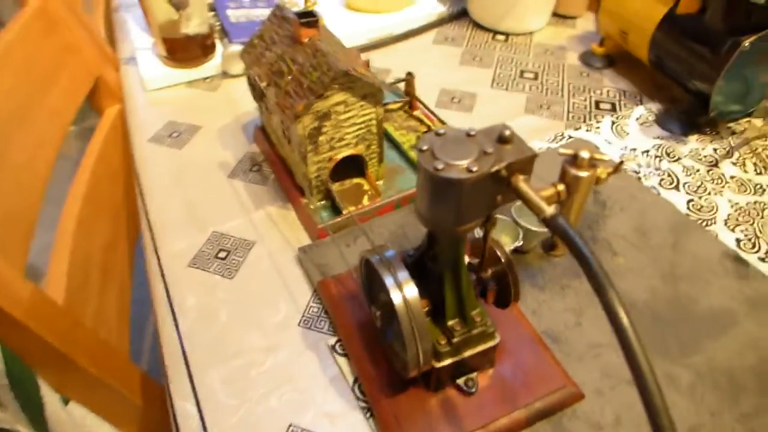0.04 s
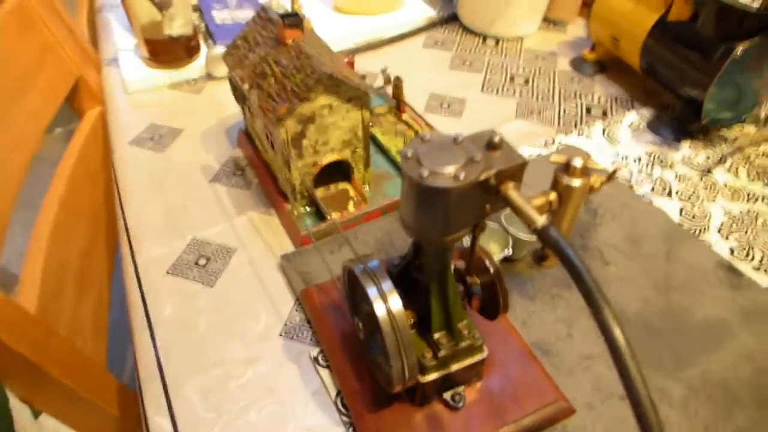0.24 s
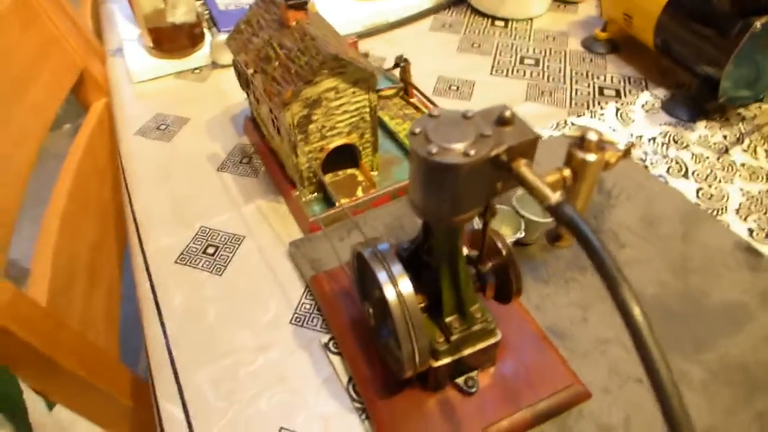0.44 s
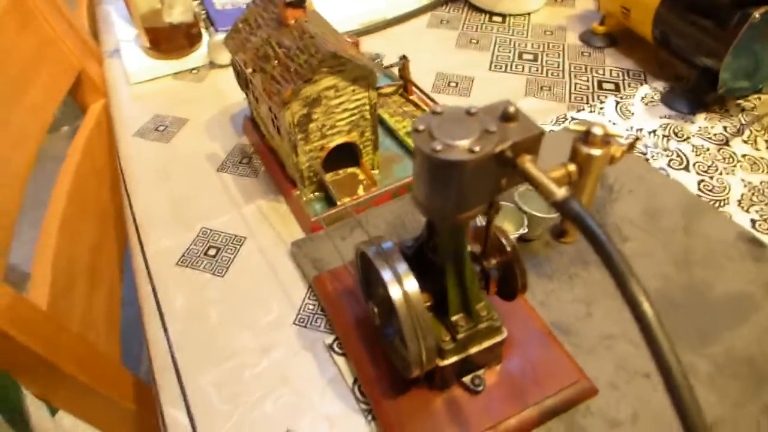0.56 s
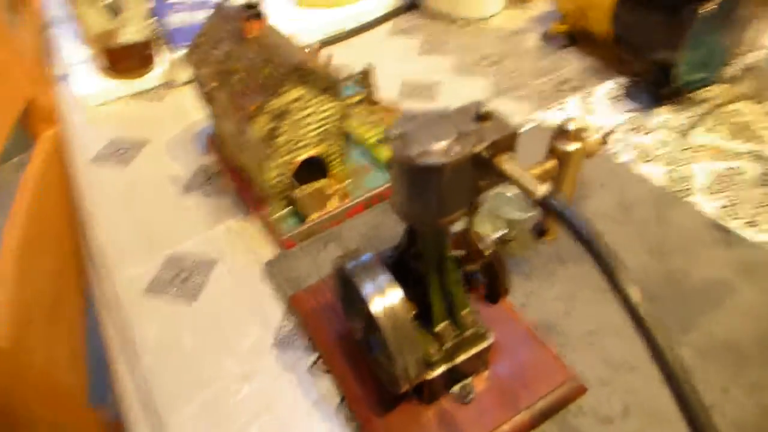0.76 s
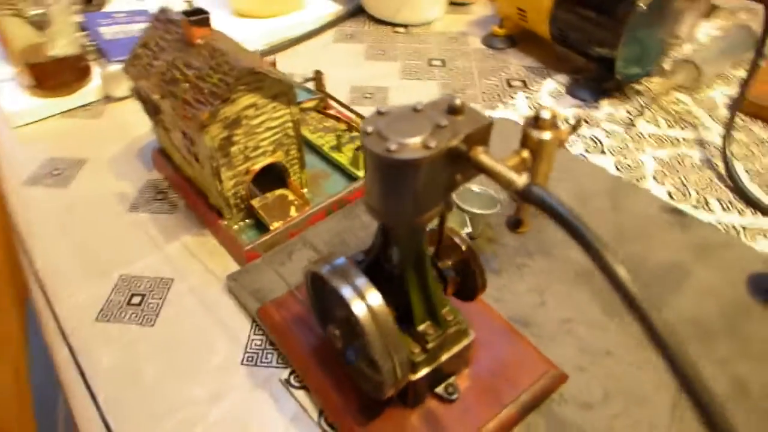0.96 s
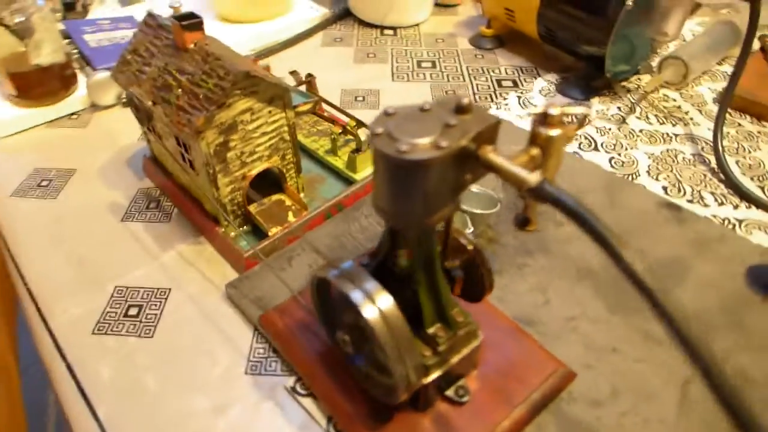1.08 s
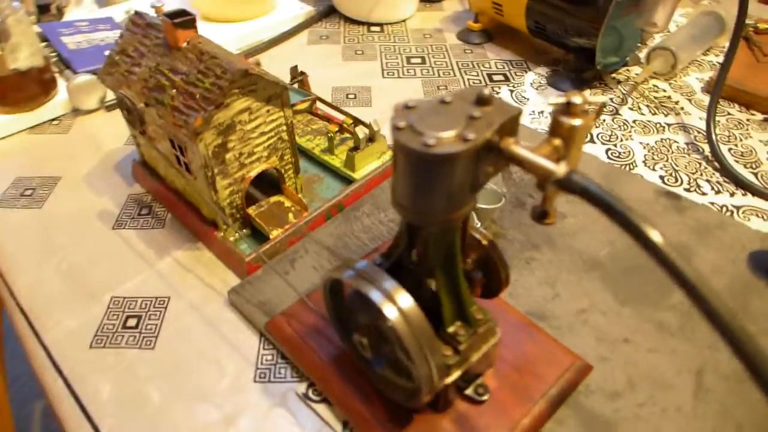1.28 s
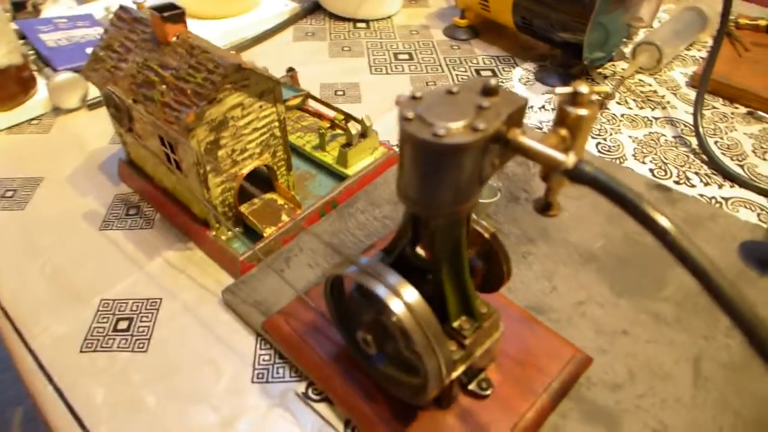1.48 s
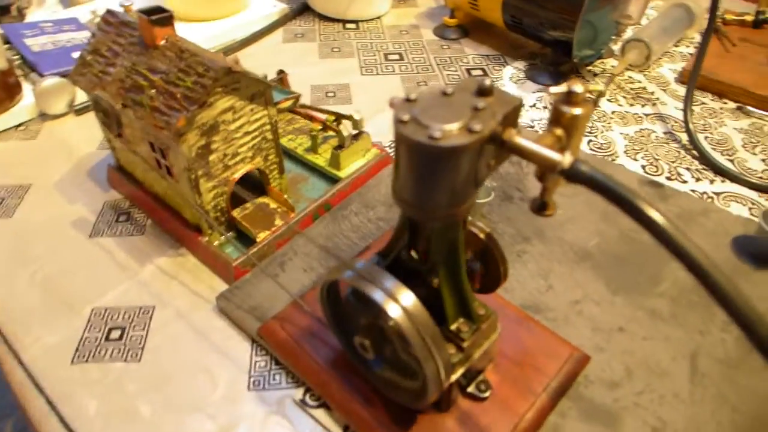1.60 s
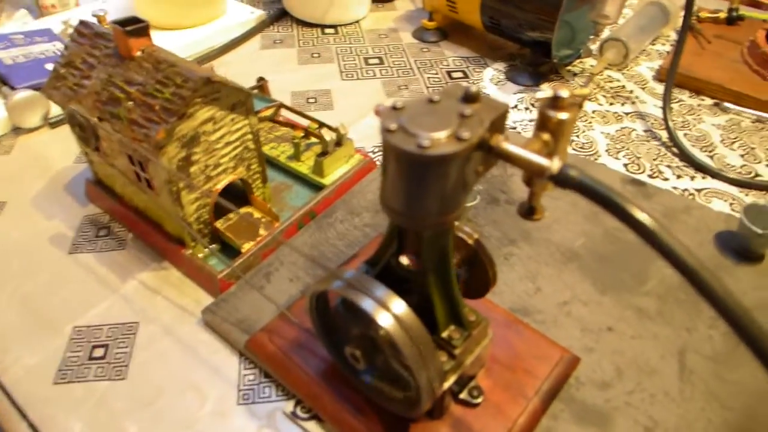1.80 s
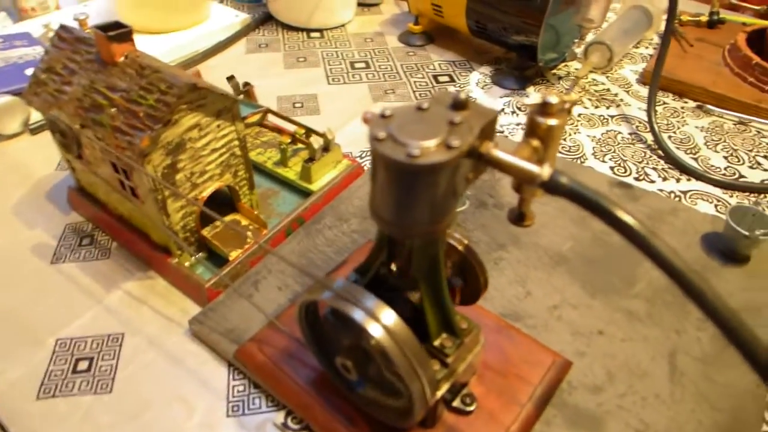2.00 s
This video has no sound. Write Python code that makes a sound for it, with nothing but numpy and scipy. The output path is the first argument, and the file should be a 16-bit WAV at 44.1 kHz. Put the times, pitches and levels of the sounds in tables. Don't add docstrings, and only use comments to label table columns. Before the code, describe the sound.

A little single-cylinder engine runs rapidly, sharp air puffs and loose metallic clatter on a wooden base

```python
import sys
import numpy as np
from scipy import signal
from scipy.io import wavfile

SR = 44100
rng = np.random.default_rng(int(sys.argv[2]) if len(sys.argv) > 2 else 0)


def magnitude_from_level(level_db):
    exponent = np.asarray(level_db, float) / 20
    return 10 ** exponent


def put_to_file(sound):
    columns = np.atleast_2d(sound).T
    safe = np.clip(columns, -1, 1)
    whole_steps = np.round(safe * 32767)
    wavfile.write(sys.argv[1], SR, whole_steps.astype(np.int16))


N = 89964

# start_s, hiss_peak_db, thump_relative_db, hold_ms
DOWN_STROKES = [(0.0255, -5, -12, 5.3), (0.16, -8.5, -7.5, 17), (0.2852, -7.5, -6.5, 6.6),
                (0.396, -5.5, -12.5, 6.7), (0.5047, -6, -8.5, 6.4), (0.6209, -9, -5.5, 9),
                (0.7688, -5.5, -10.5, 8.7), (0.8896, -4, -6.5, 1.3), (1.0091, -7, -6.5, 6.6),
                (1.1277, -4.5, -8, 3.1), (1.2397, -5.5, -10, 2.5), (1.3504, -5, -12.5, 1.7),
                (1.4586, -6.5, -12.5, 8.2), (1.5672, -5.5, -12.5, 5.2), (1.6796, -7, -7.5, 11),
                (1.7985, -7.5, -6.5, 1.7), (1.8991, -7.5, -9, 9.4), (1.9936, -9, -5.5, 5.9)]
# start_s, hiss_peak_db, thump_relative_db, hold_ms
RETURN_STROKES = [(0.0842, -9, -7.5, 6.5), (0.2145, -11.5, -2, 8), (0.3247, -11.5, -2.5, 9.2),
                  (0.4332, -7.5, -5.5, 7.4), (0.5527, -14.5, -0.5, 8.6), (0.7023, -8, -6.5, 5.7),
                  (0.8233, -10.5, 0, 2.5), (0.9393, -6.5, -15, 9.2), (1.0627, -8, -3.5, 6.9),
                  (1.1742, -12, -2.5, 6.8), (1.287, -4, -11.5, 2.7), (1.398, -7.5, -13, 5.1),
                  (1.5029, -14.5, 2, 8.6), (1.6122, -8.5, -7, 4.3), (1.7426, -7, -6, 1.8),
                  (1.8377, -6.5, -6, 3.9), (1.942, -11.5, -6, 7.7), (2.0314, -6.5, -3, 5)]
# freq_hz, level_db_per_hz
PUFF_SPECTRUM = [(530, -70), (900, -2.5), (1900, -26.5), (2330, -1), (3770, -7.5), (5040, -4), (10200, -5),
                 (13800, -8), (16000, -22)]
# freq_hz, level_db, t60_s
BASE_MODES = [(557, -2.5, 0.11), (595.5, -8.5, 0.15), (642.7, -2.5, 0.085), (720, 3, 0.04),
              (724.3, -5, 0.091), (784.7, -3.5, 0.089), (1001, -7, 0.054), (1082, -8, 0.11),
              (1214, -13, 0.15), (1030, -47, 0.031), (666, -5, 0.033)]
# freq_hz, level_db, t60_s
FRAME_MODES = [(1461, 1.5, 0.024), (1601, -5, 0.11), (1702, -4.5, 0.037), (2370, -6, 0.067),
               (2474, -8.5, 0.049), (2737, -7.5, 0.078), (3100, -9.5, 0.079), (3420, -3, 0.052),
               (4130, -9, 0.094), (5038, 2.5, 0.027), (6970, 3.5, 0.016), (8620, 7.5, 0.0078),
               (9200, -25, 0.017), (9900, -24, 0.024)]
# start_s, peak_db, favoured_pitch_hz
JOLTS = [(0.028, -11.5, 725), (0.054, -12, 716), (0.085, -15, 644), (0.162, -15.5, 899), (0.162, -17, 780),
         (0.224, -13, 573), (0.243, -15, 625), (0.287, -14, 760), (0.329, -15, 720), (0.397, -14, 555),
         (0.422, -32, 746), (0.438, -9, 640), (0.506, -10.5, 820), (0.558, -16, 730), (0.622, -19, 552),
         (0.702, -14.5, 910), (0.705, -13, 660), (0.77, -14, 570), (0.777, -11.5, 615), (0.828, -10, 619),
         (0.898, -14.5, 557), (0.923, -20, 706), (0.945, -21.5, 615), (1.01, -7.5, 770), (1.068, -14, 590),
         (1.129, -10.5, 775), (1.177, -9.5, 613), (1.219, -40, 686), (1.245, -7.5, 714), (1.272, -10, 584),
         (1.291, -9, 656), (1.355, -11, 660), (1.385, -18, 710), (1.4, -9.5, 587), (1.426, -20, 590),
         (1.462, -13, 554), (1.505, -10.5, 714), (1.569, -14, 552), (1.616, -11, 623), (1.682, -12, 554),
         (1.744, -37, 700), (1.746, -13, 557), (1.801, -12, 821), (1.841, -4, 690), (1.9, -9, 572),
         (1.947, -13, 730), (1.972, -17, 566), (1.996, -17, 553),
         (.008, -16, 710),
    (.042, -16, 735),
    (.066, -18.5, 720),
    (.091, -16.5, 640),
    (.891, -22, 620),
    (1.810, -14, 760),
    (1.862, -19, 590),
    (2.033, -13, 710),
]
# start_s, peak_db, low_lean_db_per_octave
KNOCKS = [
    (-.008, -8.5, -6.5),
    (0.9123, -12.5, -0.5),
    (1.7793, -14, -0.5),
    (1.808, -22, 0),
]
# freq_hz, level_db, t60_s
LINK_MODES = [(987, -9.5, 0.12), (1080, -17, 0.052), (1440, -12, 0.05), (1545, -6, 0.088),
              (1770, -7, 0.016), (2050, -5, 0.016), (2380, -5.5, 0.053), (2510, -4, 0.034),
              (2595, -16, 0.052), (2750, -5, .02)]
# start_s, peak_db, centre_hz, length_ms
TICKS = [(.011, -25, 5400, 0.91), (0.15, -37, 5000, 1.1), (.359, -26, 4000, 1.0), (0.565, -21, 5000, 0.9),
         (0.585, -21, 9000, 1.3), (.984, -34, 6000, 0.64), (1.121, -23, 5460, 1.5), (1.321, -20, 9000, 1.1),
         (1.3225, -11.5, 5100, 2.4), (1.3265, -18, 2600, 1.1), (1.830, -17, 5030, 1.3),
         (1.929, -18, 6000, 1.3)]
# start_s, peak_db, centre_hz
SLAPS = [(0.0263, 1, 4000), (0.0862, 0, 8650), (0.162, -4, 8570), (0.2862, 0, 5290), (0.397, 2, 4950),
         (0.4344, -4, 8350), (0.5067, -1, 10400), (0.6215, -7, 5190), (0.7038, -14, 3420),
         (0.7692, -9, 4970), (0.8894, -19, 6900), (1.0096, -20, 4190), (1.1288, -9, 6840),
         (1.2396, -1.5, 3440), (1.3224, -6, 5170), (1.3508, -8, 5020), (1.3987, 7.5, 8700),
         (1.4601, 1, 4900), (1.5678, -4, 6910), (1.6801, -4, 5100), (1.9011, 8, 9100), (1.9944, -4, 3420)]
# start_s, peak_db, pitch_hz, length_ms
SQUEAKS = [
    (.576, -24, 4000, 5.6),
    (.84, -31, 3950, 18),
    (.958, -33, 4130, 11),
    (.972, -34, 4050, 14),
    (1.195, -27, 3960, 11),
    (1.405, -40, 4080, 28),
    (1.803, -26, 2370, 36),
]
# freq_hz, level_db_per_hz
LEAK_SPECTRUM = [(530, -50), (900, -5), (1600, -8.5), (1880, -13.5), (2470, -10.5), (9880, -12.5),
                 (13700, -19), (16000, -25)]
# freq_hz, level_db_per_hz
HUM_SPECTRUM = [(25, -13.5), (60, -21), (95, -8.5), (124, -2.5), (250, -2), (420, 2.5), (500, -8.5),
                (900, -14)]
# freq_hz, level_db_rms
HUM_LINES = [(123, -54), (216, -50), (266, -52.5), (338, -51)]
# freq_hz, likeness_0_to_1
LIKENESS = [(60, 0.87), (180, 0.93), (550, 0.94), (1650, 0.66), (4970, 0.74), (15000, 0.69)]


def rms_one(x):
    return x / np.sqrt(np.mean(x ** 2) + 1e-20)


def at_hz(points, hz):
    freq_hz, value = np.array(points)[:, :2].T
    return np.interp(np.log(hz), np.log(freq_hz), value)


def drift(rate_hz):
    r = np.exp(-80 * np.pi * rate_hz / SR)
    slow = signal.lfilter([1], [1, -2 * r, r * r], rng.standard_normal(N // 40 + 2002))[2000:]
    return np.interp(np.arange(N) / 40, np.arange(len(slow)), rms_one(slow))


def ring(clicks, hz, t60_s):
    r = magnitude_from_level(-60 / (abs(t60_s) * SR))
    w = 2 * np.pi * hz / SR
    return signal.lfilter([0, np.sin(w)], [1, -2 * r * np.cos(w), r * r], clicks + 1e-18)


def air(spectrum, patchy_db, rate_hz):
    low_hz, high_hz = spectrum[0][0] / 1.3, min(spectrum[-1][0] * 1.05, 19000)
    edges_hz = np.geomspace(low_hz, high_hz, int(3 * np.log2(high_hz / low_hz)) + 1)
    white = rng.standard_normal((2, 2, N))
    out = 0
    for k, (a, b) in enumerate(zip(edges_hz, edges_hz[1:])):
        band = signal.butter(2, [a, b], "band", fs=SR, output="sos")
        mid, side = signal.sosfilt(band, white[k % 2])
        centre_hz = np.sqrt(a * b)
        alike = np.clip(at_hz(LIKENESS, centre_hz), 0, 1)
        gain = magnitude_from_level(at_hz(spectrum, centre_hz) + patchy_db * drift(rate_hz))
        out = out + gain * (np.sqrt(1 + alike) * mid + np.sqrt(1 - alike) * side * [[1], [-1]])
    return rms_one(out)


def strokes(rows, rise_s, fall_s, tail_db, tail_s):
    load_lag_s = 0.00018
    t = np.arange(N) / SR

    def port(start_s, level_db, hold_s, bleed_db, bleed_s):
        u = t - start_s
        opened = np.clip(u / rise_s + 1, 0, 2) / 2
        burst = np.exp(-np.clip(u - hold_s, 0, None) / fall_s)
        bleed = magnitude_from_level(bleed_db) * np.exp(-np.clip(u, 0, None) / bleed_s)
        return (magnitude_from_level(level_db) * opened ** 0.84) ** 2 * (burst ** 2 + bleed ** 2)

    hiss, load, blows = np.zeros((3, N))
    for start_s, hiss_db, rel_db, hold_ms in rows:
        load_s, load_db, hold_s = start_s + load_lag_s, hiss_db + rel_db, hold_ms / 1000
        hiss += port(start_s, hiss_db, hold_s, tail_db, tail_s)
        load += port(load_s, load_db, 0.37 * hold_s, tail_db - 2, 1.2 * tail_s)
        for late_s, gain_db in ((0, -4), (rise_s, 0), (2 * rise_s, -3)):
            blows[int((load_s + late_s) * SR)] = magnitude_from_level(load_db + 13.5 + gain_db)
    return hiss, load, blows


def puffs(hiss):
    swell = magnitude_from_level(-12.5) * np.sqrt(hiss) * magnitude_from_level(0.25 * drift(135))
    return swell * air(PUFF_SPECTRUM, patchy_db=1.5, rate_hz=62)


def rattle(effort, modes, blows):
    clicks_per_s, spread_db = 2200, 2.5
    born = rng.random(N) < clicks_per_s / SR
    sizes = born * magnitude_from_level(spread_db * np.minimum(rng.exponential(1, N), 3))
    strengths = rng.standard_normal((len(modes), N))
    steady, out = 0, 0
    for k, (hz, level_db, t60_s) in zip(strengths, modes):
        uneven_blows = blows * np.sign(k) * magnitude_from_level(1.6 * np.tanh(k[::-1]))
        steady = steady + magnitude_from_level(level_db) * ring(sizes * k, hz, t60_s)
        out = out + magnitude_from_level(level_db) * ring(sizes * k * effort + uneven_blows, hz, t60_s)
    return out / np.sqrt(np.mean(steady ** 2))


def base_jolts():
    rise_s, lead_s, narrow_db_per_octave = 0.00294, 0.0035, 48
    start_s, peak_db, favoured_hz = np.transpose(JOLTS)
    t = np.arange(int(rise_s * SR)) / SR
    mode_hz, mode_db = np.array(BASE_MODES)[:, :2].T[..., None]
    shares = magnitude_from_level(-narrow_db_per_octave * np.abs(np.log2(mode_hz / favoured_hz)) + 0.5 * mode_db)
    shares = shares / np.sqrt(np.sum(shares ** 2, axis=0))
    out = 0
    for share, (hz, _, t60_s) in zip(shares, BASE_MODES):
        clicks = np.zeros(N)
        np.add.at(clicks, ((start_s - lead_s) * SR).astype(int), magnitude_from_level(peak_db - 3.5) * share)
        contact = signal.lfilter(2 / len(t) * np.cos(2 * np.pi * hz * t), 1, clicks)
        out = out + ring(contact, hz, t60_s)
    return out


def link_knocks():
    contact_s, lows_late_s_per_octave, scatter_db, scatter_s = 0.0011, 0.00062, -18, 0.0036
    t = np.arange(-1000, N) / SR
    out = 0
    for hz, level_db, t60_s in LINK_MODES:
        contact, rough = 0, rng.standard_normal(len(t))
        for start_s, peak_db, lows_db in KNOCKS:
            u = t - start_s - lows_late_s_per_octave * np.log2(3400 / hz)
            strike = np.exp(-np.abs(u) / contact_s) * np.sin(2 * np.pi * hz * u)
            scatter = magnitude_from_level(scatter_db) * np.exp(-np.abs(u) / scatter_s) * rough
            gain = magnitude_from_level(peak_db + lows_db * np.log2(2000 / hz))
            contact = contact + gain * (u > 0) * (strike + scatter)
        out = out + magnitude_from_level(level_db - 23) * ring(contact, hz, t60_s)
    return out[-N:]


def valve_ticks():
    slap_db, slap_ms, tick_q = -16, 1.3, 2.8
    t = np.arange(600) / SR
    out = np.zeros(N + len(t))
    rows = TICKS + [(s, db + slap_db, hz, slap_ms) for s, db, hz in SLAPS]
    noises = rng.standard_normal((len(rows), len(t)))
    for (start_s, peak_db, hz, length_ms), noise in zip(rows, noises):
        spit = rms_one(signal.lfilter(*signal.iirpeak(hz, tick_q, fs=SR), noise))
        u = t * 1000 / length_ms
        i = int(start_s * SR)
        out[i:i + len(t)] += magnitude_from_level(peak_db - 3) * spit * np.minimum(u, 1) * np.exp(1 - u)
    return out[:N]


def squeaks():
    t = np.arange(N) / SR
    waver = np.cumsum(60 * drift(55)) / SR
    out = 0
    for start_s, peak_db, hz, length_ms in SQUEAKS:
        swell = np.sin(np.pi * np.clip((t - start_s) * 1000 / length_ms, 0, 1))
        out = out + magnitude_from_level(peak_db + 3 * drift(80)) * swell * np.sin(2 * np.pi * (hz * t + waver))
    return out


def shudder(hiss):
    gusts = rng.standard_normal((3, N)) * np.sqrt(hiss + 0.0003) * magnitude_from_level(5.7 * drift(5.5))
    low = signal.sosfilt(signal.butter(2, 80, fs=SR, output="sos"), gusts)
    return magnitude_from_level(-59) * rms_one(low[0] + 0.67 * low[1:])


def leak():
    return magnitude_from_level(-31.5) * air(LEAK_SPECTRUM, patchy_db=3.5, rate_hz=27)


def room(x):
    t60_s, wall_cut_hz = 0.097, 31000
    dull = np.exp(-2 * np.pi * wall_cut_hz / SR)
    out = np.zeros((2, N))
    lags = (rng.uniform(0.008, 0.035, size=16) * SR).astype(int)
    for k, lag in enumerate(lags):
        loop, gain, state = x.copy(), magnitude_from_level(-60 * lag / SR / t60_s), [0.]
        for i in range(lag, N, lag):
            back, state = signal.lfilter([gain * (1 - dull)], [1, -dull], loop[i - lag:i], zi=state)
            loop[i:i + lag] += back[:N - i]
        out[k % 2] += (loop - x) * (-1) ** (k // 2)
    return out


def hum():
    t = np.arange(N) / SR
    out = magnitude_from_level(-40) * air(HUM_SPECTRUM, patchy_db=1, rate_hz=30)
    for hz, level_db in HUM_LINES:
        level = np.sqrt(2) * magnitude_from_level(level_db + 1.7 * drift(8.2))
        out = out + level * np.sin(2 * np.pi * hz * t + 1.54 * drift(1.76))
    return out


def scene():
    down = strokes(DOWN_STROKES, rise_s=0.0014, fall_s=0.0041, tail_db=-1.5, tail_s=0.03)
    back = strokes(RETURN_STROKES, rise_s=0.0021, fall_s=0.0018, tail_db=-1.5, tail_s=0.02)
    hiss, load, blows = np.add(down, back)
    exhaust = puffs(hiss)
    idle_db = -38.5
    base_effort = np.sqrt(load + magnitude_from_level(2 * idle_db + 7))
    frame_effort = np.sqrt(hiss + magnitude_from_level(2 * idle_db))
    base = magnitude_from_level(-4) * rattle(base_effort, BASE_MODES, magnitude_from_level(-10) * blows) + base_jolts()
    frame = magnitude_from_level(-16) * rattle(frame_effort, FRAME_MODES, magnitude_from_level(-1) * blows)
    body_cut = signal.cheby1(8, 1, 516, "high", fs=SR, output="sos")
    parts = signal.sosfilt(body_cut, base + frame + link_knocks() + valve_ticks() + squeaks())
    echoes = magnitude_from_level(-15) * room(parts + exhaust.mean(axis=0))
    return exhaust + parts + echoes + shudder(hiss) + leak() + hum()


def top_cut(x):
    return signal.sosfilt(signal.butter(12, 15700, fs=SR, output="sos"), x)


def record(dry):
    mic_top_hz, offset = 15650, -0.0028
    mix = signal.sosfilt(signal.cheby1(10, 1, mic_top_hz, fs=SR, output="sos"), dry) + offset
    return top_cut(mix)


dry = scene()
out = record(dry)
put_to_file(out)
```